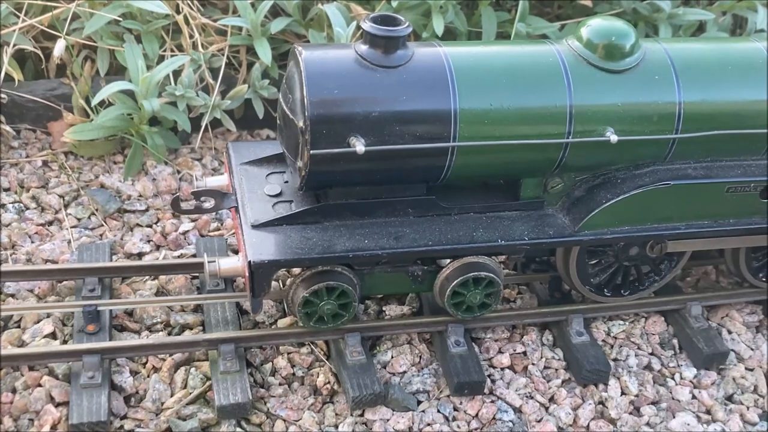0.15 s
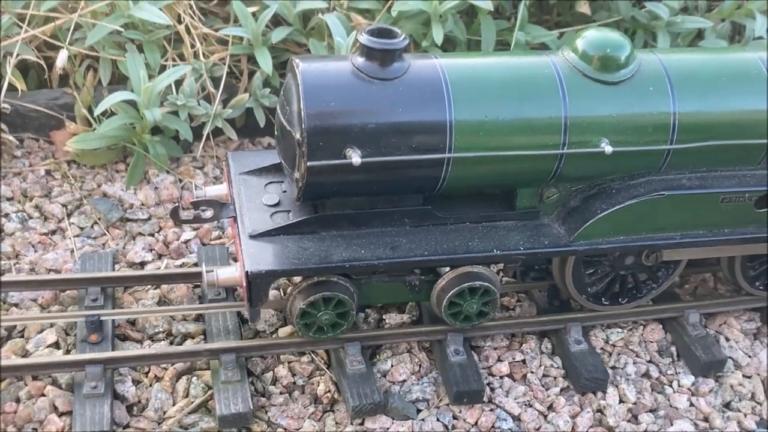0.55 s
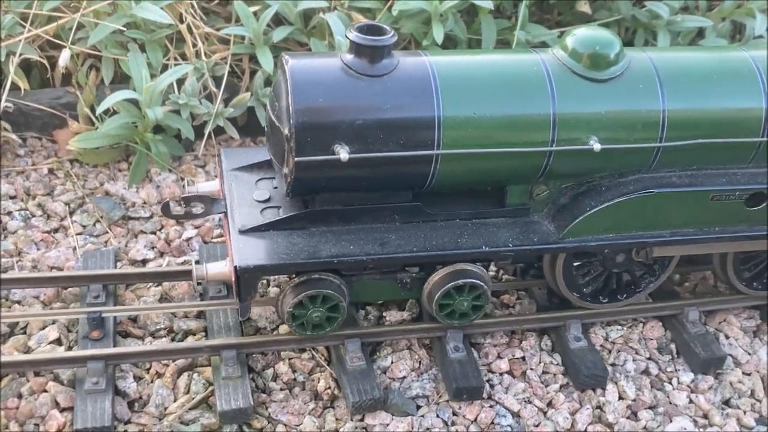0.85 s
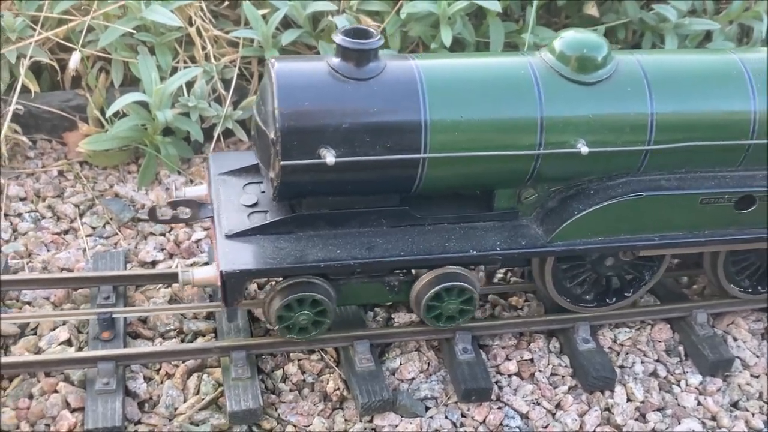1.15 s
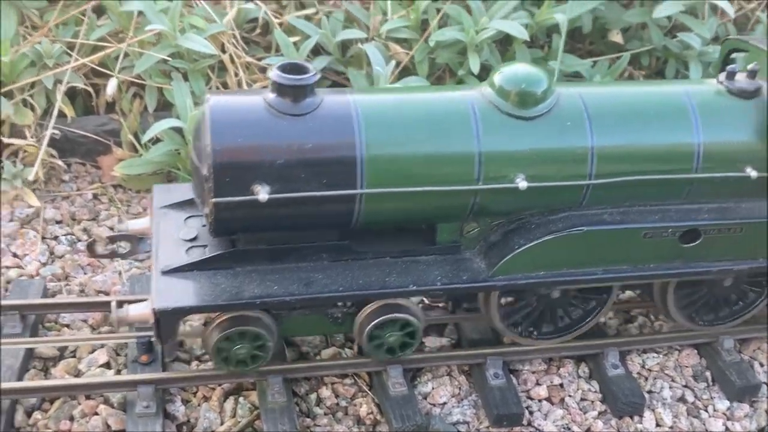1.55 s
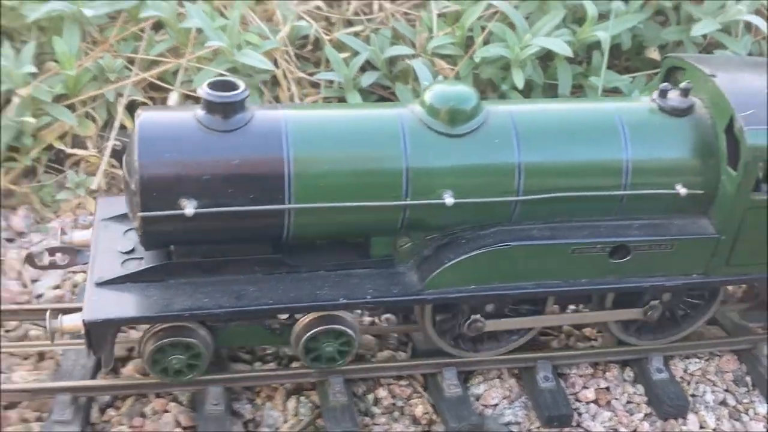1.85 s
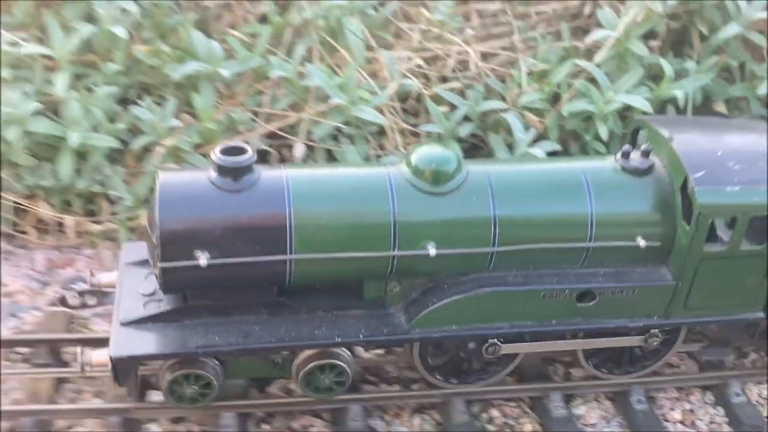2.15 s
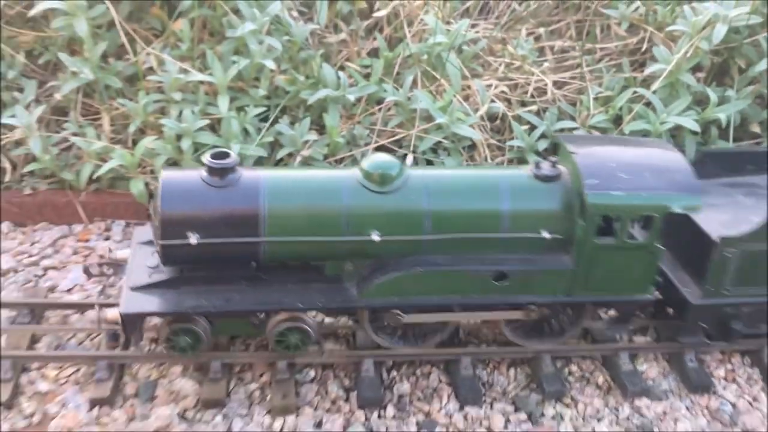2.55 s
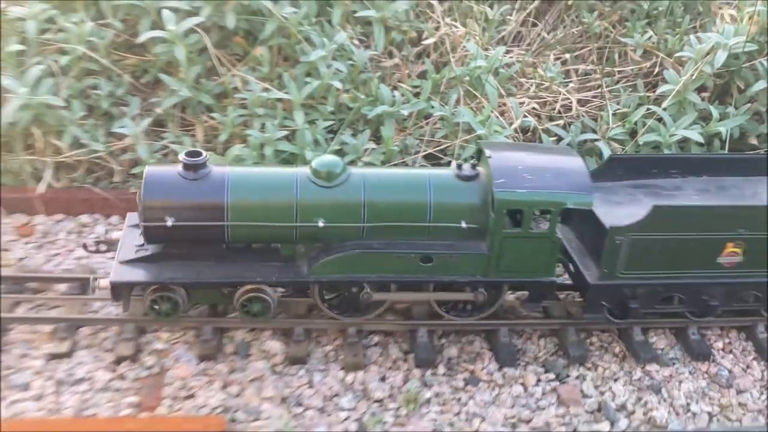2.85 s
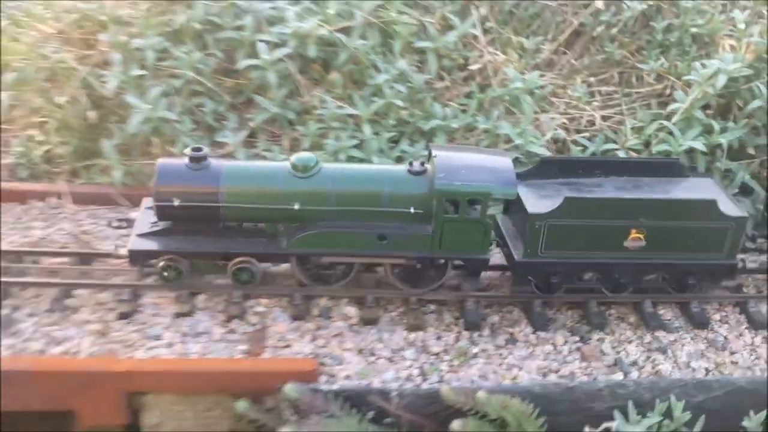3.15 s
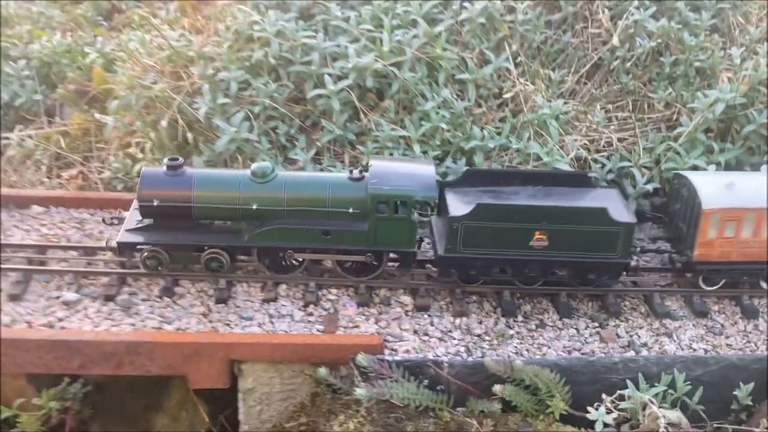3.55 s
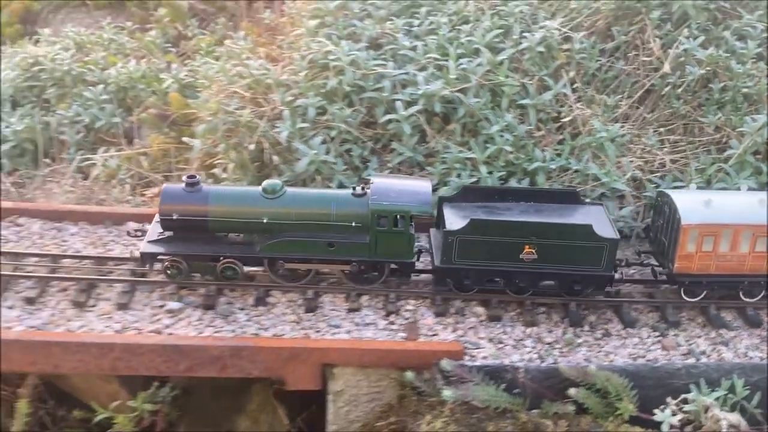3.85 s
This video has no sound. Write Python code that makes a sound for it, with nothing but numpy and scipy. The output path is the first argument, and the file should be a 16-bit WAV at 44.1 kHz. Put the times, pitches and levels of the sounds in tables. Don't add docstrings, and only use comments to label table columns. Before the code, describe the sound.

A small clockwork model locomotive clicks, then whirs and rattles away along a garden track.

```python
import sys
import numpy as np
from scipy import signal
from scipy.fft import rfft, irfft, next_fast_len
from scipy.io import wavfile
from scipy.ndimage import uniform_filter1d, map_coordinates

SR = 44100
rng = np.random.default_rng(int(sys.argv[2]) if len(sys.argv) > 2 else 0)


def pcm_store(signal):
    levels = np.round(np.clip(np.atleast_2d(signal), -1, 1) * 32767)
    wavfile.write(sys.argv[1], SR, levels.astype(np.int16).T)


def field_ratio(decibels):
    return 10 ** (np.asarray(decibels, dtype=float) / 20)


N = 176400

# [f/Hz, width/Hz, level/dB]
SHELL = [(481, 182, -13.5), (973, 112, -8), (1226, 66, -3.5), (1627.5, 124, -2), (2355, 300, -12)]
# [f/Hz, width/Hz, level/dB]
FRAME = [(2800, 320, -4), (3300, 280, 0), (3750, 350, -6), (4400, 400, -7), (6300, 700, -12)]
# [f/Hz, width/Hz, level/dB]
STEEL = [(7240, 730, -6.5), (9730, 470, -3), (10750, 370, -2.5), (12500, 1260, -8.5), (15050, 1200, -16.5)]


def unit(x):
    return x / np.sqrt(np.mean(x ** 2) + 1e-20)


def curve(rows):
    s, value = np.transpose(rows)[:2]
    return np.interp(np.arange(N) / SR, s, value)


def wobble(rate):
    knots = rng.standard_normal(int(N * rate / SR) + 4)
    return map_coordinates(knots, [np.arange(N) * rate / SR])


def filtered(x, response):
    m = next_fast_len(N + 8192)
    return irfft(rfft(x, m) * response(np.fft.rfftfreq(m, 1 / SR)), m)[..., :N]


def shaped(x, points):
    f, db = np.transpose(points)
    return unit(filtered(x, lambda hz: field_ratio(np.interp(np.log(hz + 1), np.log(f + 1), db))))


def rung(x, body):
    def response(f):
        total = 0
        for k, (centre, width, db) in enumerate(body):
            drag = 1j * f * width
            total = total + (-1) ** k * field_ratio(db) * drag / (centre ** 2 - f ** 2 + drag)
        return total
    return filtered(x, response)


def pair(alike):
    a, b = rng.standard_normal((2, N))
    angle = np.arccos(np.clip(alike, 0, 1)) / 2
    shared, apart = np.cos(angle) * a, np.sin(angle) * b
    return np.array([shared + apart, shared - apart])


def gritty(rate, depth_db):
    return unit(rng.standard_normal(N) * field_ratio(depth_db * wobble(rate)))


def stroke(s, length, rise_s, stop_s):
    t = np.arange(N) / SR
    return np.clip(np.minimum((t - s) / rise_s, (s + length - t) / stop_s), 0, 1)


def placed(x, lag_s, pan_db, wet_db, t60=0.046):
    t = np.arange(SR // 8) / SR
    tail = rng.standard_normal((2, len(t))) * field_ratio(-60 * t / t60)
    wet = signal.fftconvolve(x[None], tail / np.linalg.norm(tail[0]), axes=1)[:, :N]
    wet = filtered(wet, lambda hz: 1 / (1 + 1j * hz / 7000))
    lags = np.array([[lag_s], [-lag_s]])
    pans = np.array([[pan_db], [-pan_db]])
    direct = filtered(x, lambda hz: np.exp(-1j * np.pi * hz * (1 - 0.59 / (1 + (hz / 2100) ** 8)) * lags))
    return filtered(direct + field_ratio(wet_db) * wet, lambda hz: field_ratio(pans / (1 + (hz / 4000) ** 4)))


def wind():
    # [t/s, level/dB]
    gust_points = [(.05, -57), (.5, -68.5), (1.3, -66.5), (1.75, -72), (2.0, -50.5), (2.15, -58),
                   (2.5, -62), (2.75, -47.5), (3.0, -51.5), (3.22, -42.5), (3.29, -48), (3.4, -47.5),
                   (3.47, -49), (3.57, -42.5), (3.63, -41.5), (3.78, -39.5), (3.9, -42), (4, -57.5)]
    # [f/Hz, level/dB]
    gust_colour = [(15, -28), (35, 1.5), (60, 3), (100, -1), (200, -36), (320, -92)]
    # [t/s, level/dB]
    traffic_points = [(0, -54.5), (1.3, -56.5), (1.7, -50), (2.4, -50), (3.0, -52), (3.3, -62.5), (4, -72)]
    # [f/Hz, level/dB]
    traffic_colour = [(50, -14.5), (85, -5), (125, -1), (150, -3.5), (175, -56), (260, -60.5)]
    # [f/Hz, level/dB]
    hush_colour = [(110, -61), (190, 1.5), (302, -7), (350, -12), (471, -9), (645, -18), (15900, -39.5)]
    hush_db = -73

    air = shaped(pair(0.69), gust_colour)
    power = np.abs(uniform_filter1d(np.mean(air ** 2, axis=0), SR // 25))
    steady = air / (power + .05) ** .3
    gusts = unit(steady * field_ratio(2 * wobble(16)))
    gust_db = curve(gust_points)
    flutter = unit(filtered(gusts, lambda hz: np.minimum(hz, 300) ** 5))
    flutter = field_ratio(2.4 * (gust_db - gust_db.max()) - 8.0) * flutter
    traffic = unit(shaped(pair(0.96), traffic_colour) * field_ratio(1.05 * wobble(11)))
    hush = field_ratio(hush_db + 1.4 * wobble(4.9)) * shaped(pair(0.071), hush_colour)
    return field_ratio(gust_db) * (gusts + flutter) + field_ratio(curve(traffic_points)) * traffic + hush


def thumps():
    # [t/s, f/Hz, length/s, level/dB]
    slaps = [(1.97, 56.5, 0.023, -39), (2.656, 69.4, 0.0086, -35.5), (2.735, 59, 0.017, -35.5),
             (3.206, 66, 0.042, -34.5), (3.378, 60, 0.014, -41), (3.55, 69.4, 0.011, -34),
             (3.58, 94.4, .012, -29.5), (3.657, 94, 0.015, -31.5), (3.692, 71, 0.0087, -26),
             (3.718, 74.4, 0.0081, -29), (3.766, 132, 0.0084, -30.5), (3.785, 83.7, 0.013, -41),
             (3.831, 79, 0.009, -30)]
    t = np.arange(N) / SR
    out = np.zeros(N)
    for s, hz, length, db in slaps:
        swell = np.exp(-((t - s) / length) ** 2)
        out += field_ratio(db) * swell * np.cos(2 * np.pi * hz * (t - s))
    return out


def bird():
    # [t/s, length/s, from f/Hz, to f/Hz, level/dB]
    chirps = [
        (1.15, .025, 3000, 4200, -83),
        (1.262, .03, 4300, 4600, -82),
    ]
    out = np.zeros(N)
    for s, length, from_hz, to_hz, db in chirps:
        u = np.arange(int(length * SR)) / (length * SR)
        turns = np.cumsum(from_hz + (to_hz - from_hz) * u) / SR
        out[int(s * SR):][:len(u)] += field_ratio(db) * np.sin(np.pi * u) * np.sin(2 * np.pi * turns)
    return out * (1 + 1.2 * wobble(410))


def scuffs():
    # [t/s, length/s, level/dB, bright tilt/dB]
    scrapes = [
        (3.368, 0.081, -51.5, -5),
        (3.435, 0.078, -50.5, -1),
        (3.498, 0.2, -60.5, 4),
        (3.645, 0.16, -60, 4),
        (3.769, 0.084, -53, 6.5),
        (3.819, 0.039, -45, -5.5),
    ]
    # [f/Hz, level/dB]
    gravel = [(180, -37), (300, -9.5), (712, -6), (1580, 0.5), (4570, -16), (7530, -6.5), (9190, -16),
              (11400, -12.5), (15900, -9)]
    grit = shaped(gritty(300, 3) * field_ratio(1.5 * wobble(55)), gravel)
    low = filtered(grit, lambda hz: 1 / (1 + (hz / 3400) ** 4))
    high = grit - low
    out = np.zeros(N)
    for s, length, db, bright_db in scrapes:
        out += stroke(s, length, 0.032, 0.017) * field_ratio(db) * (low + field_ratio(bright_db) * high)
    return out


def hollow_rings():
    # [t/s, f/Hz, width/Hz, level/dB]
    taps = [
        (.128, 4130, 29.8, -4.5),
        (1.381, 2760, 50, -10),
        (3.834, 760, 70, -1),
        (3.836, 1750, 150, -9),
    ]
    out = np.zeros(N)
    for s, hz, width, db in taps:
        tap = field_ratio(db) * (np.arange(N) == round(s * SR))
        out += rung(tap, [(hz, width, 0)])
    return out


def rolling():
    # [t/s, level/dB]
    roll_points = [(1.45, -71), (1.9, -60.5), (2.55, -56), (3.0, -53.5), (3.5, -56.5), (4, -56)]
    # [f/Hz, level/dB]
    rail = [(110, -54), (170, 1), (400, -1), (650, -10.5), (1100, -3), (2200, -17), (5000, -23.5),
            (15900, -34.5)]
    on = np.clip((np.arange(N) / SR - roll_points[0][0]) / 0.016, 0, 1)
    grind = shaped(pair(.7) * field_ratio(1.5 * wobble(200)), rail)
    return on * field_ratio(curve(roll_points) + 2.2 * wobble(22)) * grind


def slips():
    # [t/s, length/s, shell level/dB, frame level/dB, steel level/dB]
    skids = [
        (0.082, 0.059, -73, -81.5, -89),
        (0.132, 0.092, -69, -77, -79),
        (.69, .07, -77.5, -87, -85),
        (1.371, 0.11, -64.5, -72.5, -70),
        (1.38, .03, -80, -73, -83),
        (1.401, 0.14, -63.5, -74, -81),
        (1.51, 0.29, -96, -92, -90),
        (1.86, 0.067, -57, -56.5, -53),
        (2.009, 0.21, -64, -67, -66),
        (2.69, 0.192, -83, -76, -65.5),
    ]
    hisses = [unit(rung(gritty(300, 3), body)) for body in (SHELL, FRAME, STEEL)]
    return sum(stroke(s, length, 0.013, 0.0092) * (field_ratio(dbs) @ hisses) for s, length, *dbs in skids)


def rattles():
    # [t/s, peak level/dB]
    hits = [(1.6716, -57), (1.6911, -55), (1.7204, -50), (1.7534, -54), (1.7764, -52.5), (1.8174, -54),
            (1.8314, -65), (1.9624, -56), (1.9704, -46), (2.0034, -56), (2.0303, -54), (2.0617, -51),
            (2.0774, -43), (2.1374, -54), (2.1474, -50), (2.1974, -40), (2.2084, -43.5), (2.2584, -42.5),
            (2.2914, -43.5), (2.3194, -45.5), (2.3476, -49), (2.3984, -72), (2.4174, -56), (2.4249, -47),
            (2.4867, -53), (2.5037, -57), (2.5192, -45.5), (2.5341, -42.5), (2.615, -47), (2.6389, -40.5),
            (2.7482, -46), (2.7591, -43), (2.8404, -62), (2.8784, -47.5), (2.9033, -44), (2.9264, -47),
            (2.9332, -50), (2.9414, -47), (2.9564, -46), (2.9759, -42), (2.9904, -48), (3.026, -44.5),
            (3.0344, -41), (3.0639, -41.5), (3.0849, -42), (3.1373, -50), (3.2151, -45.5), (3.4644, -51),
            (3.5554, -49), (3.6114, -47.5), (3.6914, -52), (3.7484, -48.5)]
    # [f/Hz, level/dB]
    tones = [(3243, 0.5), (3027, -7.5), (2610, -10.5), (4400, -8.5), (964, -8), (1280, -12), (1530, -7),
             (2400, -12.5)]
    ring_s, gain_db, snap_db = 0.009, -0.5, -2.5
    t, out = np.arange(SR // 30) / SR, np.zeros(N + SR)
    hz, level = np.transpose(tones)
    chance = rng.standard_normal((len(hits), 2, len(hz)))
    clicks = np.diff(rng.standard_normal((len(hits), len(t) + 1)))
    snaps = field_ratio(snap_db - 60 * t / 0.0029) * clicks
    for (s, db), (size, tune), snap in zip(hits, chance, snaps):
        detuned = hz * (1 + .028 * tune)
        ring = field_ratio(level + 3 * size) @ np.sin(2 * np.pi * detuned[:, None] * t)
        out[round(s * SR):][:len(t)] += field_ratio(db + gain_db) * (field_ratio(-60 * t / ring_s) * ring + snap)
    return out[:N]


def blows(rows, hold_s, crack_db, shell_db, frame_db, steel_db):
    lead_s, lead_db = .006, -20
    s, db, low, high = np.transpose(rows)
    t = np.arange(SR // 10) / SR - lead_s
    crack = [(4920, 14000, 0.0077)]
    parts = ((SHELL, low + shell_db, .045), (FRAME, 0 * db + frame_db, .018),
             (STEEL, high + steel_db, .022), (crack, high / 2 + crack_db, .015))
    out = 0
    for body, gain, t60 in parts:
        scrape = field_ratio(lead_db / 2 + 3000 * t)
        fade = field_ratio(-60 * np.maximum(t - hold_s, 0) / t60)
        shape = np.where(t < 0, scrape, fade)
        at = np.zeros(N)
        at[np.round((s - lead_s) * SR).astype(int)] = field_ratio(db + gain)
        out = out + rung(signal.fftconvolve(at, shape)[:N] * gritty(700, 2), body)
    return out


def gears():
    # [t/s, level/dB]
    whir_points = [(1.52, -81.5), (1.72, -69.5), (2.2, -65), (2.45, -66), (2.75, -62.5), (3.08, -66.5),
                   (3.13, -65), (3.3, -64.5), (3.5, -62), (4, -66)]
    # [t/s, speed/turns per s]
    speed_points = [(1.5, 8.5), (1.75, 11.1), (2.25, 15.4), (2.7, 23.5), (3.1, 23), (4, 21.7)]
    bites = [0, -4, -2, -5, -1, -4]
    teeth = np.cumsum(curve(speed_points)) * len(bites) / SR + .15 * wobble(70)
    k = np.floor(teeth).astype(int)
    chance_db = 2 * rng.standard_normal(N // 100)
    size = field_ratio(np.array(bites)[k % len(bites)] + chance_db[k])
    ping = rung(size * np.diff(k, prepend=k[0]), FRAME)
    click = unit(rung(ping, [(3300, 1100, 0)]))
    rub = unit(size * field_ratio(-25 * (teeth - k)) * rng.standard_normal(N))
    level = field_ratio(curve(whir_points)) * (np.arange(N) > whir_points[0][0] * SR)
    rubbed = field_ratio(14) * rung(rub, FRAME) + field_ratio(13.0) * rung(rub, SHELL) + field_ratio(6.5) * rung(rub, STEEL)
    return level * (field_ratio(-9) * click + rubbed)


def scene():
    # [t/s, peak level/dB, tin shell level/dB, bright steel level/dB]
    tick_rows = [(0.1201, -20, -10, -13.5), (0.1324, -32.5, -5.5, -39), (0.1994, -44, 2.5, -25),
                 (0.2474, -69.5, 15, -24), (0.6669, -57, 6, -18.5), (0.7147, -65.5, 11, 2.5),
                 (0.7645, -45, 1, -9), (0.8286, -48.5, 3.5, 1.5), (0.8404, -45, -5.5, -16.5),
                 (1.29, -49, -8, -44), (1.331, -52.5, -9, -43), (1.3853, -41.5, -28, -45),
                 (1.4272, -40, 0, -11), (1.4582, -46, 7, -29), (1.507, -40, -19, -47),
                 (1.6207, -42, -4.5, -37), (1.6383, -37.5, -14, -53), (1.6514, -58, 0, -16)]
    # [t/s, peak level/dB, tin shell level/dB, bright steel level/dB]
    knock_rows = [(1.73, -45.5, 2.5, -11), (1.7978, -41, -8.5, -47), (1.858, -40.5, -19, -26),
                  (1.9924, -43.5, 5.5, -3), (2.0518, -39.5, -18, -16.5), (2.1219, -39.5, -1.5, -14),
                  (2.1843, -41, -6, -13.5), (2.2397, -34, -4, -23), (2.3008, -39, -2, -15.5),
                  (2.4101, -39.5, -18, -17.5), (2.5685, -45.5, -1, -14), (2.6218, -38.5, -6, -11),
                  (2.6723, -37, -7.5, -8.5), (2.72, -44.5, 0, -16), (2.8165, -40, -7, -11.5),
                  (2.9022, -42, -13, -19), (2.9744, -36.5, -11, -36), (3.0046, -44, -14, -30),
                  (3.0216, -42, -3, -23), (3.0593, -37.5, -10.5, -19), (3.0982, -37.5, -5, -11.5),
                  (3.2415, -39, -13, -11.5), (3.292, -43, -28, -18), (3.3383, -38.5, -7, -17),
                  (3.3792, -39, -8, -15.5), (3.9225, -49.5, -4, -3), (3.9646, -47, 5, -9.5)]
    near_lag_s, far_lag_s = 0.00027, .000257
    engine_wet_db, pass_s = -1.5, 2.55

    ticks = blows(tick_rows, hold_s=0.0033, crack_db=-7.0, shell_db=10, frame_db=-4, steel_db=11)
    knocks = blows(knock_rows, hold_s=0.0043, crack_db=-40.0, shell_db=10.5, frame_db=5.5, steel_db=13.5)
    engine = knocks + gears() + slips() + rattles()
    before = stroke(-1.086, pass_s + 1, 1, 0.35)

    garden = wind() + thumps() + bird()
    feet = placed(scuffs() + hollow_rings(), -0.000097, -0.16, 3.3)
    start = placed(ticks, far_lag_s, 1.0, -2.5, t60=0.084)
    near = placed(engine * before, near_lag_s, 1.8, engine_wet_db)
    away = placed(engine * (1 - before), far_lag_s, 2.7, engine_wet_db)
    return garden + feet + rolling() + start + near + away


def band_limit(x):
    return signal.sosfilt(signal.butter(12, 16790, fs=SR, output="sos"), x)


def record(dry):
    # [f/Hz, width/Hz, depth/0-1]
    dips = [(9250, 330, .7), (13550, 420, .7)]
    start_s, top_hz = 0.0515, 15950

    def ports(hz):
        passed = hz < top_hz
        for centre, width, depth in dips:
            passed = passed * (1 - np.clip(depth, 0, 1) * np.exp(-((hz - centre) / width) ** 2))
        return passed

    opened = dry * (np.arange(N) > start_s * SR)
    return band_limit(filtered(opened, ports))


dry = scene()
out = record(dry)
pcm_store(out)
```